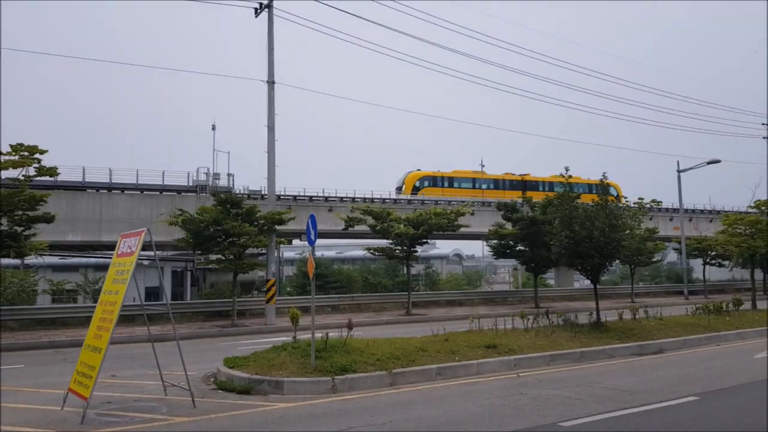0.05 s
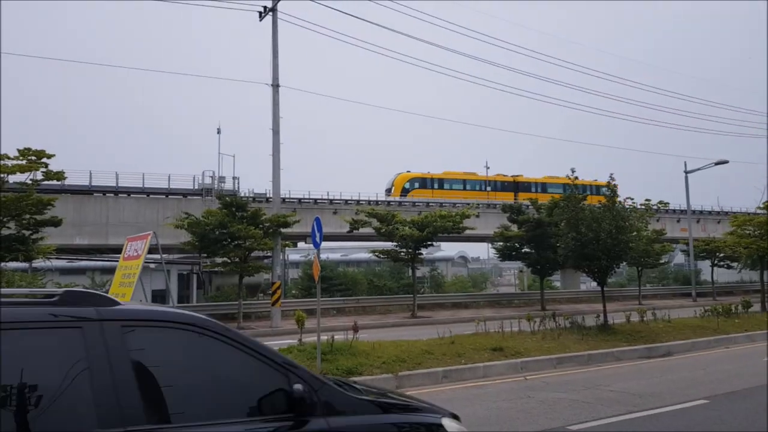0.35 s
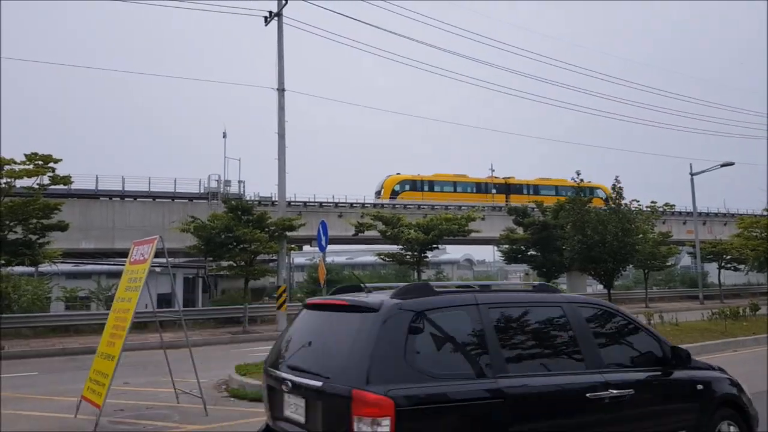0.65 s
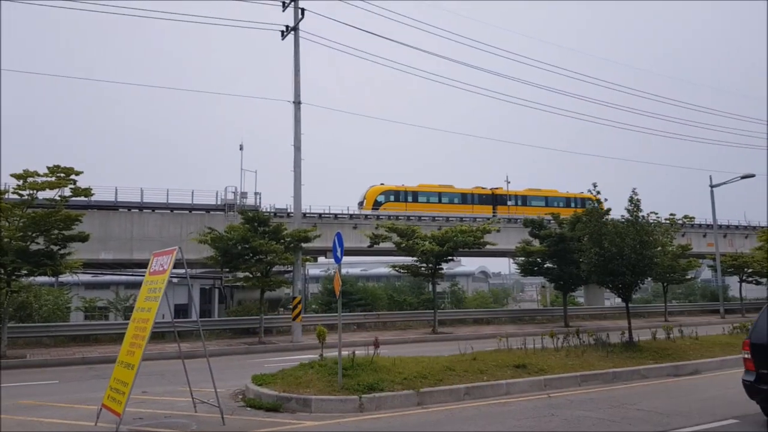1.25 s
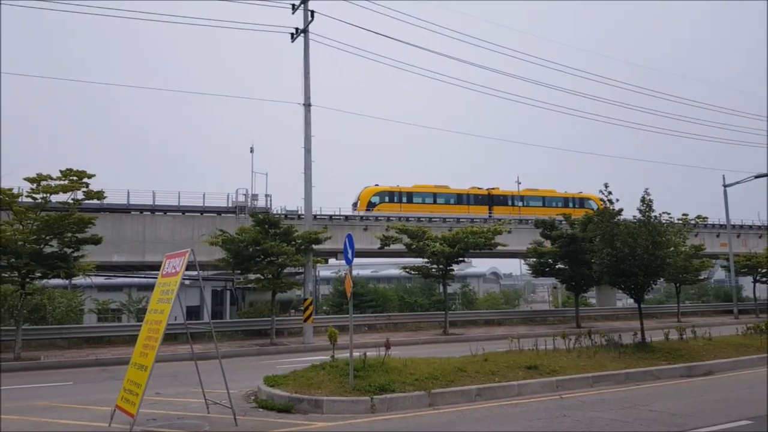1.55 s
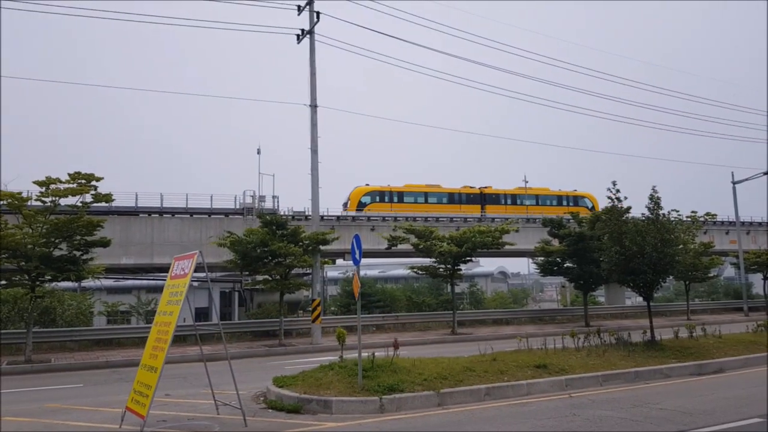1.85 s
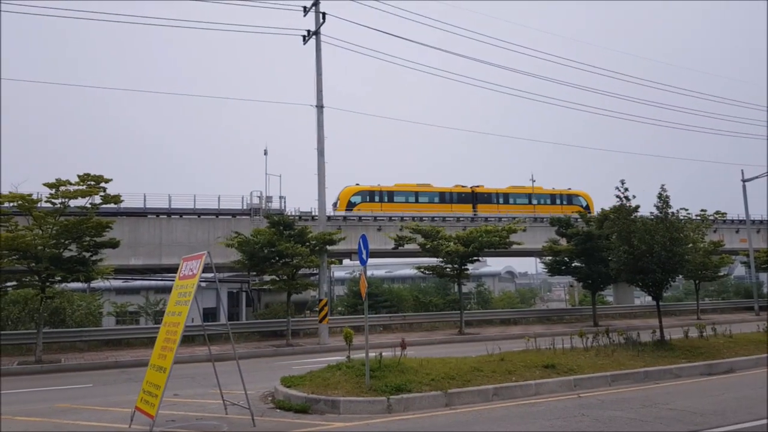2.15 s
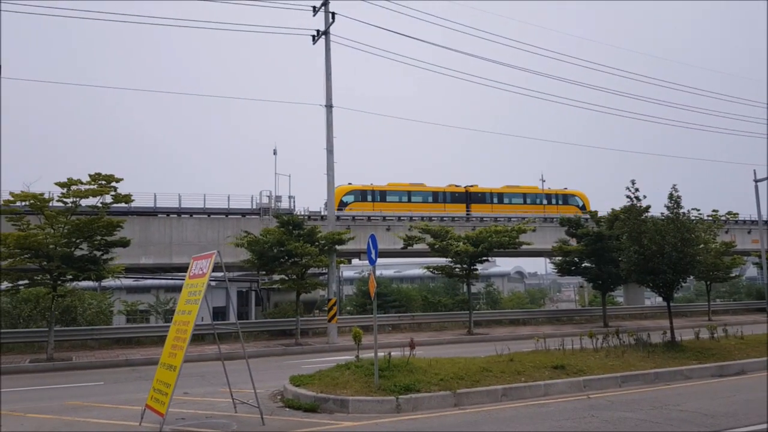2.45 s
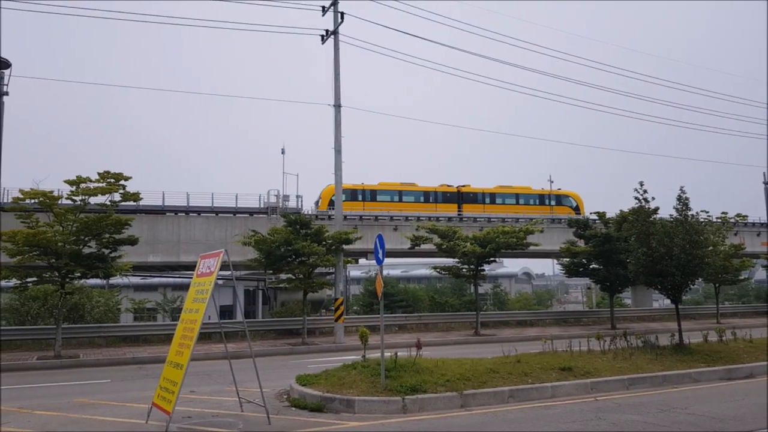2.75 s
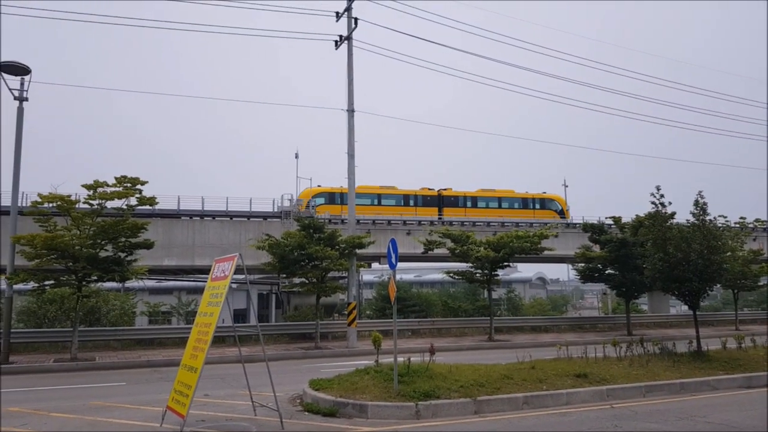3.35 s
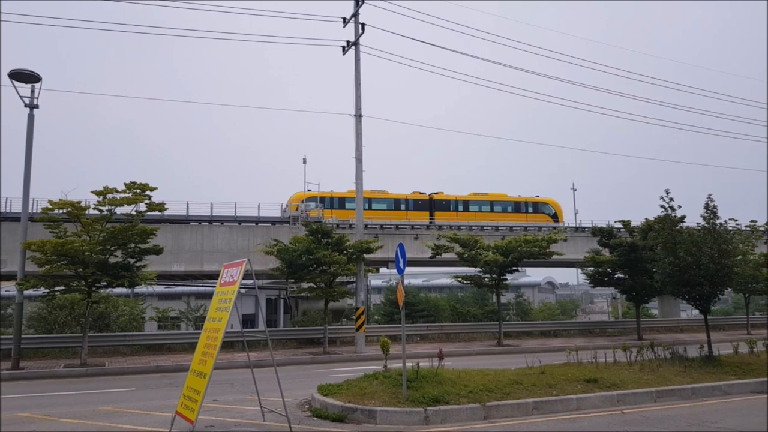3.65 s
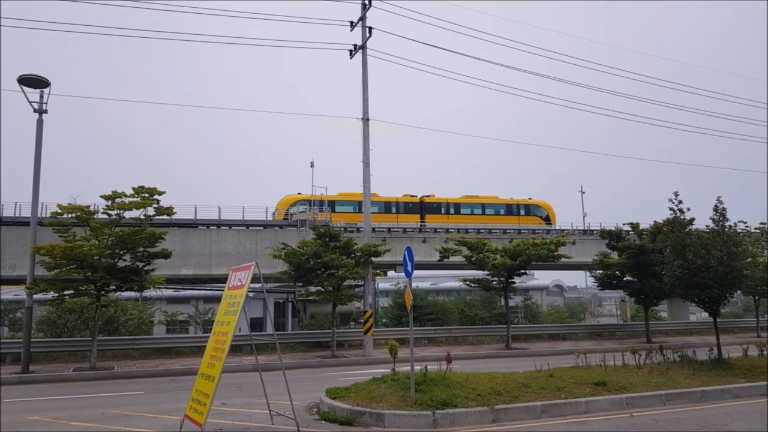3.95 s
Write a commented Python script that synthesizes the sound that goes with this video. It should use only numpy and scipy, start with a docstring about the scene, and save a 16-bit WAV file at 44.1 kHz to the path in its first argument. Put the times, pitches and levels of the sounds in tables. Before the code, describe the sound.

Tyres rush as a minivan drives past left to right, leaving faint traffic and insects.

```python
"""A minivan passes close from left to right: its tyres roar, rush, hiss and ring, and its engine drones
at the firing rate, all fading down the road. Its wake buffets the two microphone ports.
Distant traffic remains as a wash of tyre noise, and another engine starts to hum.
Roadside insects tick with their wings, whistle and rasp, and a far bird chirps faintly."""
import sys
import numpy as np
from scipy.fft import rfft, irfft, next_fast_len
from scipy.io import wavfile
from scipy.ndimage import map_coordinates

SR = 44100
rng = np.random.default_rng(int(sys.argv[2]) if len(sys.argv) > 2 else 0)


def transcribe(u):
    """Save the signal u as a 16-bit wav file named by the first command-line argument.

    u: samples, shape (n,) or (channels, n), limited to [-1, 1]; the rate is SR.
    q: integer samples, one column per channel.
    """
    v = np.clip(np.atleast_2d(u).T, -1, 1)
    q = np.round(v * 32767).astype(np.int16)
    wavfile.write(sys.argv[1], SR, q)


N = 176400

# the van's travel across the stereo field: time_s, left_lag_samples
VAN_LAG = [(0, -16.5), (.13, -16.5), (.48, 1.5), (.8, 6), (1.2, 12.5), (2.2, 15.5)]
# treble leans left beside the van: time_s, left_minus_right_db
TREBLE_PAN = [(0, 1), (.25, 7), (.6, 5), (1.4, 1.5)]


def tyres():
    """Roar, tread rush and gritty hiss swell and fade as the van goes by."""
    # band faders: time_s, roar_db, tread_db, upper_tread_db, hiss_db
    faders = [(0, -33.5, -32, -34.5, -38.5), (.22, -31, -35.5, -36, -35.5),
              (.45, -30.5, -33.5, -35.5, -35.5), (.65, -31, -33, -35, -38), (.88, -34.5, -36, -36.5, -44.5),
              (1.15, -36.5, -38.5, -39, -49.5), (1.45, -41, -43.5, -42.5, -50.5),
              (1.9, -46, -46.5, -50, -60), (2.5, -53.5, -53.5, -57.5, -65.5)]
    # fader for the highest treble: time_s, level_db
    fizz_fader = [(0, -41), (.55, -41), (1.1, -45.5), (1.6, -56), (2.45, -61.5), (2.58, -69)]
    # the five bands of tyre noise, low to high: frequency_hz, relative_db
    roar_band = [(25, -41), (50, -1.5), (350, 0), (470, -9.5), (800, -32.5)]
    tread_band = [(430, -39), (560, -11), (690, -3.5), (1030, -8), (1200, -14.5), (1600, -54)]
    upper_band = [(850, -37), (1200, 2.5), (1480, 4.5), (2100, -3.5), (2500, -2), (3800, -35)]
    hiss_band = [(2000, -2.5), (3350, 4.5), (3950, 0), (5500, -1.5), (8000, -15)]
    fizz_band = [(4500, -13), (6200, 3.5), (7300, 7), (8800, 1.5), (11000, -5), (13500, -1), (15800, -13)]
    # the tread rush shifts between the ports: time_s, left_minus_right_db
    tread_pan = [(0, -5), (.5, -1), (1.1, 3), (2.5, 1)]
    fade_start_s, fade_db_per_s = 2.46, 1  # the van sinks under the traffic
    fade = amp(-fade_db_per_s * np.maximum(clock() - fade_start_s, 0))
    roar_db, tread_db, upper_db, hiss_db = curves(faders)
    roar = amp(roar_db - 1.5) * rolling(roar_band, focus=0.87)
    tread = amp(tread_db + 1.76) * rolling(tread_band, focus=1.26)
    tread += amp(upper_db + 2.0) * rolling(upper_band, focus=1.13)
    hiss = fade * amp(hiss_db + 2.06) * rolling(hiss_band, focus=0.57)
    fizz = amp(curves(fizz_fader)[0]) * rolling(fizz_band, focus=0.31)
    grit = amp(0.85 * wobble(160))
    body = fade * (roar + tread * pan(curves(tread_pan)[0]))
    return body + (hiss + fizz) * grit * pan(curves(TREBLE_PAN)[0])


def tread_horn():
    """The wedge of air under the tyres rings; its pitch shifts as the van turns its tail to the listener."""
    # resonance between tread and road: time_s, pitch_hz, level_db
    resonance = [(.3, 800, -62), (.48, 835, -33.5), (.69, 940, -37), (.87, 912, -34.5), (1.05, 904.6, -46),
                 (1.25, 921, -44), (2.5, 650, -71)]
    # its width: offset_hz, relative_db
    width = [(35, -0.5), (100, -10), (600, -55)]
    hz, db = curves(resonance)
    lower, upper = [noise(width, channels=1)[0] * tone(ratio * hz) for ratio in (1, 1.62)]
    return arriving(amp(db) * (lower + amp(-8) * upper), curves(VAN_LAG)[0])


def wheel_ring():
    """A thin metallic ring swells once per turn of the wheels and flutters in between."""
    # the ring's colour: frequency_hz, relative_db
    band = [(4250, -17), (4720, -2.5), (4950, -8), (5400, -29.5)]
    # its fader: time_s, level_db
    fader = [(0, -43), (.3, -37.5), (.6, -39), (1.4, -61), (2.2, -95)]
    turns_per_s = 13.4
    swells = .5 + pulses(0, N / SR, turns_per_s, width_s=.014)
    level = amp(curves(fader)[0] - 4 + 3.8 * wobble(90))
    return swells * level * rolling(band, focus=0.29) * pan(curves(TREBLE_PAN)[0])


def van_engine():
    """The van's exhaust note, a cluster of drivetrain tones and the whirr of the engine bay."""
    # exhaust note: time_s, firing_hz, note_db, octave_db
    exhaust = [(0, 53.92, -30, -29), (.33, 54.98, -29, -37), (.5, 54.7, -31, -29), (.75, 54, -45, -40.5),
               (1.5, 52.52, -43.5, -41), (2, 51.04, -47, -46.5), (2.5, 49, -56, -70)]
    # drivetrain tones: firing_rate_multiple, level_db
    drivetrain = [(3.76, -40), (4.25, -42.5), (4.75, -43), (5.3, -51)]
    # engine bay whirr: frequency_hz, relative_db
    bay_band = [(250, -0.5), (440, 7), (520, 7.5), (850, -27.5)]
    # the whirr carries while the van's nose faces the listener: time_s, level_db
    bay_fader = [(.25, -33), (.9, -70)]
    hz = curves(exhaust)[0]
    drone = sum(amp(db + 2.8 * wobble(7.37)) * tone(multiple * hz * (1 + 0.0095 * wobble(20)))
                for multiple, db in drivetrain)
    fade_start_s, fade_db_per_s = 0.32, 10.5
    drone *= amp(-fade_db_per_s * np.maximum(clock() - fade_start_s, 0))
    whirr = amp(curves(bay_fader)[0]) * rolling(bay_band, focus=0.89)
    return arriving(engine(exhaust, rough_db=0.7) + drone, curves(VAN_LAG)[0]) + whirr


def rolling(spectrum, focus):
    """One band of the van's noise: a moving direct part, favoured by focus, plus street scatter."""
    # sound straight from the van, before focus scales it: time_s, share
    directness = [(0, 0.81), (.3, 0.4), (1, 0.32), (2.5, .65)]
    share = np.clip(focus * curves(directness)[0], 0, 1)
    direct = arriving(noise(spectrum, channels=1)[0], curves(VAN_LAG)[0])
    return np.sqrt(share) * direct + np.sqrt(1 - share) * diffuse(spectrum)


def engine(rows, rough_db):
    """An engine's firing note and its octave, slightly unsteady in pitch and level."""
    hz, note_db, octave_db = curves(rows)
    hz = hz * (1 + 0.007 * wobble(12))
    return sum(amp(db + rough_db * wobble(14)) * tone(k * hz) for k, db in ((1, note_db), (2, octave_db)))


def wake():
    """The van's wake buffets the ports: lumpy rumble at each and the thump of a single eddy."""
    # wind on the ports: time_s, level_db
    gusts = [(.22, -40.5), (.8, -48), (1.04, -41), (1.22, -35.5), (1.5, -48.5), (2.4, -57), (3.9, -47)]
    # the wake hits the right port: time_s, left_minus_right_db
    gust_pan = [(.7, 6), (1.1, -12), (1.4, 0)]
    # eddy: centre_s, peak_db, port (0 left, 1 right)
    eddies = [(1.844, -13.5, 0)]
    lump_db, thump_hz, thump_decay_s = 3, 75, .008
    lumps = amp(lump_db * np.array([wobble(22.9), wobble(22.26)]))
    rumble = noise([(20, -13), (45, 18.5), (90, 17.5), (250, -3), (900, -64)])
    out = amp(curves(gusts)[0] + 0.5) * pan(curves(gust_pan)[0]) * lumps * rumble
    for centre_s, db, port in eddies:
        t = clock() - centre_s
        out[int(port)] += amp(db) * np.cos(2 * np.pi * thump_hz * t) * np.exp(-np.abs(t) / thump_decay_s)
    return out


def traffic():
    """Far tyres from both ends of the road, their rumble, and the hum of the next engine."""
    # far tyres and their bass: frequency_hz, relative_db
    road_band = [(200, -23.5), (320, -3.5), (380, -2), (480, -10.5), (700, -4), (900, -4.5), (2400, -19),
                 (3500, -27.5), (6500, -32), (9000, -40.5), (12000, -52)]
    rumble_band = [(22, -27), (50, 5), (200, -1), (300, -7), (450, -46.5)]
    # fader for both: time_s, level_db
    fader = [(2, -45), (2.75, -45.5), (3.3, -43.5), (4, -41.5)]
    # the next engine: time_s, firing_hz, note_db, octave_db
    next_engine = [(2.45, 66.9, -60, -77), (2.63, 68.15, -39.5, -54), (3.1, 67.6, -40, -50),
                   (4, 69.5, -41, -41.5)]
    left, right = noise(road_band)
    road_ends = amp(-3.5) * arriving(left, -20.0) + amp(-5.0) * arriving(right, 15.2)
    road = unit(diffuse(road_band) + road_ends)
    rumble = amp(2.0) * diffuse(rumble_band)
    level = amp(curves(fader)[0] + .6 * wobble(4.816))
    return level * (road + rumble) + engine(next_engine, rough_db=2.0)


def insect_ticks():
    """An insect's wing strokes, each a short ring with two overtones, over a faint buzz."""
    # pace of the wing: time_s, strokes_per_s
    pace = [(1.85, 51.9), (2.25, 47)]
    # tick fader: time_s, level_db
    fader = [(1.4, -55), (1.71, -48.5), (1.82, -52), (2.06, -51), (2.24, -50.5)]
    # harmonics 1 to 3 of the ring: relative_db, left_minus_right_db
    partials = [(-1, 2), (-.5, 1), (-3.5, -1)]
    start_s, end_s = 1.404, 2.262
    ring_hz, scatter_hz = 4640, 270
    buzz = 0.083 * (clock() > start_s) * (clock() < end_s)
    strokes = pulses(start_s, end_s, curves(pace)[0], width_s=.0012)
    pitches = [ring_hz + scatter_hz * wobble(2500) for port in range(2)]
    ring = sum(amp(db) * pan(lean_db) * np.array([tone(k * hz) for hz in pitches])
               for k, (db, lean_db) in enumerate(partials, 1))
    return (buzz + strokes) * amp(curves(fader)[0]) * ring


def insect_whistle():
    """A broken, raspy twitter takes over as the ticking ends."""
    # the whistle's contour: time_s, pitch_hz, level_db
    contour = [(2.16, 9960, -66), (2.24, 10700, -56), (2.31, 9800, -60), (2.39, 11100, -54),
               (2.45, 10000, -61.5), (2.53, 10020, -82)]
    # its width: offset_hz, relative_db
    width = [(200, 0), (500, -9), (2500, -50)]
    jitter_hz, breakup_db = 140, 3.2
    hz, db = curves(contour)
    whistle = noise(width) * tone(hz + jitter_hz * wobble(120))
    sizzle = amp(-4) * noise([(11500, -16), (13300, 3), (15000, -17)])
    return (whistle + sizzle) * amp(db - 4.0 + breakup_db * wobble(110))


def insect_trill(pitch_hz=10030):
    """A thin insect trill holds one pitch throughout."""
    return amp(-73) * tone(np.full(N, pitch_hz)) * noise([(40, 0), (150, -8), (900, -68)])


def insect_rasp():
    """A second insect joins with a soft, high, pulsing crackle."""
    # rasp fader: time_s, level_db
    fader = [(2.9, -79), (3.13, -63), (3.42, -62), (3.6, -63.5)]
    strokes = .5 + .5 * pulses(3.025, N / SR, per_s=21.3, width_s=.0055)
    crackle = amp(curves(fader)[0] + 2 * wobble(300))
    return strokes * crackle * noise([(10500, -28), (13200, 2.5), (15500, -3.5)])


def bird():
    """Faint gliding chirps, blurred by the trees."""
    # chirps: centre_s, pitch_hz, glide_hz_per_s, level_db
    chirps = [(3.16, 3500, -4000, -63), (3.65, 4060, 4500, -63), (3.8, 5530, -3000, -66)]
    blur = noise([(100, 4), (600, -29)])
    song, width_s = np.zeros(N), 0.029
    for centre_s, hz, glide, db in chirps:
        t = clock() - centre_s
        song += amp(db) * np.exp(-.5 * (t / width_s) ** 2) * tone(hz + glide * t)
    return blur * song


def diffuse(spectrum):
    """Noise from all around: alike at both ports in the bass, unrelated in the treble."""
    # stereo likeness: frequency_hz, left_right_correlation
    likeness = [(50, 0.97), (550, .94), (950, 0.94), (1500, -0.44), (2500, 0.16), (4000, 0.036)]

    def mid_side_gains(hz):
        angle = np.arccos(np.clip(along(likeness, hz), -1, 1)) / 2
        return np.array([np.cos(angle), np.sin(angle)])

    mid, side = filtered(noise(spectrum), mid_side_gains)
    return unit(np.array([mid + side, mid - side]))


def arriving(x, lag):
    """A sound reaches the left port lag samples after the right one."""
    return np.array([map_coordinates(x, [np.arange(N) + side * lag / 2], mode="mirror") for side in (-1, 1)])


def pan(db):
    """Left and right gains for a left-minus-right level difference."""
    return amp(np.array([[.5], [-.5]]) * db)


def tone(hz):
    """A sine of rms 1 that follows a pitch curve."""
    return np.sqrt(2) * np.sin(2 * np.pi * (np.cumsum(hz) / SR + rng.random()))


def pulses(start_s, end_s, per_s, width_s):
    """A train of short bell-shaped swells."""
    t = clock()
    turns = np.cumsum(per_s * (t >= start_s)) / SR
    from_peak_s = (turns - np.round(turns)) / per_s
    return np.exp(-.5 * (from_peak_s / width_s) ** 2) * (t >= start_s) * (t < end_s)


def noise(spectrum, channels=2):
    """Unrelated noises of rms 1, coloured by (frequency_hz, relative_db) points."""
    return unit(filtered(rng.standard_normal((channels, N)), lambda hz: amp(along(spectrum, hz))))


def filtered(x, response):
    """Equalise x with a gain for each frequency."""
    size = next_fast_len(N + SR // 4)
    return irfft(rfft(x, size) * response(np.fft.rfftfreq(size, 1 / SR)), size)[..., :N]


def wobble(rate):
    """A smooth random curve, rate knots a second."""
    return map_coordinates(rng.standard_normal(int(N * rate / SR) + 4), [clock() * rate])


def curves(rows):
    """Automation: one value per sample for each column after the time."""
    times, *columns = np.transpose(rows)
    return [np.interp(clock(), times, column) for column in columns]


def along(points, hz):
    """Interpolate (frequency_hz, value) points on a log axis."""
    frequencies, values = np.transpose(points)
    return np.interp(np.log(hz + 1), np.log(frequencies + 1), values)


def clock():
    """Time of each sample in seconds."""
    return np.arange(N) / SR


def amp(db):
    """Decibels to gain."""
    return 10 ** (np.asarray(db) / 20)


def unit(x):
    """Scale to rms 1."""
    return x / np.sqrt(np.mean(x ** 2) + 1e-20)


def scene():
    """Everything heard at the roadside."""
    road = tyres() + tread_horn() + wheel_ring() + van_engine() + traffic() + wake()
    insects = insect_whistle() + insect_trill() + insect_rasp() + insect_ticks()
    return road + insects + bird()


def record(dry):
    """The two ports colour the sound differently; the very top is cut off."""
    # port colour: frequency_hz, left_minus_right_db
    port_balance = [(500, .5), (1000, 2.5), (1800, 5.5), (2400, 0.5), (3300, -4), (4500, 1), (6000, -4.5),
                    (7500, 0), (11000, -2), (14000, -8.5)]
    cutoff_hz = 15800
    return filtered(dry, lambda hz: pan(along(port_balance, hz)) * (hz < cutoff_hz))


dry = scene()
out = record(dry)
transcribe(out)
```